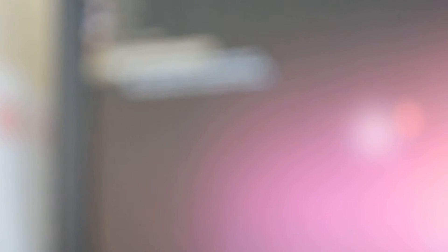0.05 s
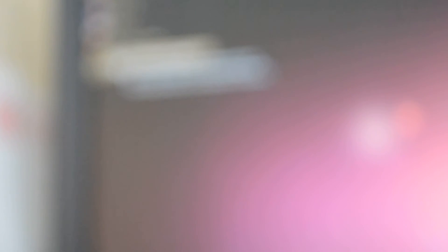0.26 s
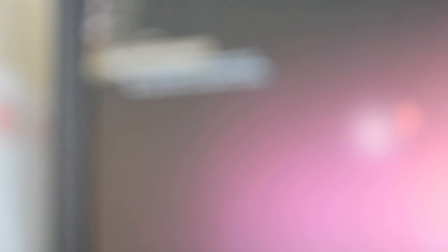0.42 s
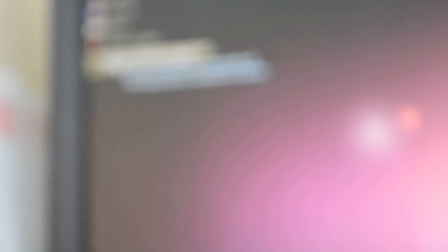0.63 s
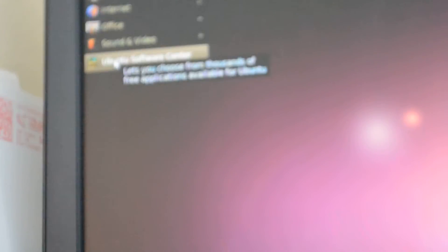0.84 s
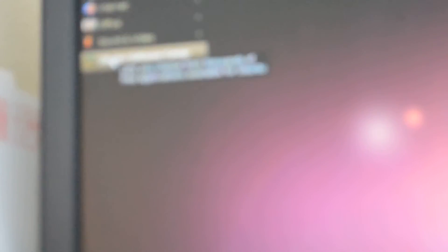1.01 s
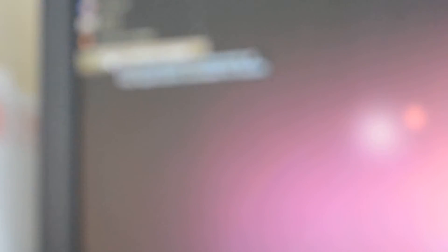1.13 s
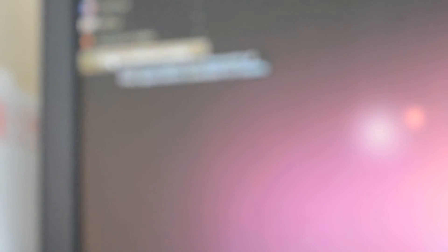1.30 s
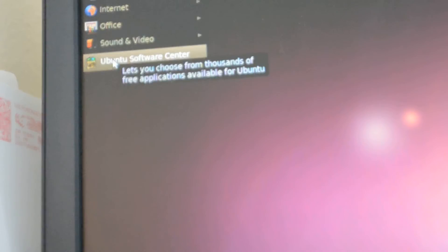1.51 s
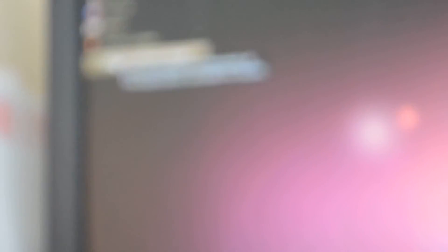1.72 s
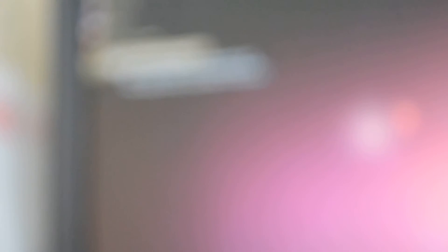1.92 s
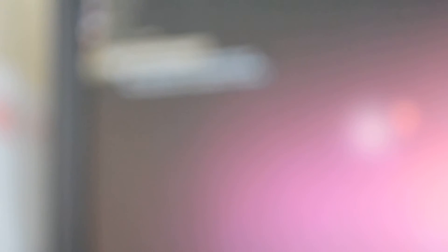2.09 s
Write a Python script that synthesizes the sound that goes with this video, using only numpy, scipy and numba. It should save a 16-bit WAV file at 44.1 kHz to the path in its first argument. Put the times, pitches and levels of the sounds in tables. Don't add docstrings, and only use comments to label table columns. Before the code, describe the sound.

After a brief quiet hiss, an autofocus motor makes two rough, wavering whirs of under a second each, separated by a tiny gap, with plastic gear clicks, high squeaks and a close, dry quiet-room sound.

```python
import sys
import numpy as np
from scipy import signal
from scipy.fft import rfft, irfft
from scipy.io import wavfile
from scipy.ndimage import uniform_filter1d
from numba import njit

SR = 44100
rng = np.random.default_rng(int(sys.argv[2]) if len(sys.argv) > 2 else 0)


def boost_factor(decibels):
    exponent = np.asarray(decibels, float) / 20
    return 10 ** exponent


def digitize_waveform(pressure):
    field = np.atleast_2d(pressure).T
    bounded = np.clip(field, -1, 1)
    quanta = np.round(bounded * 32767).astype(np.int16)
    wavfile.write(sys.argv[1], SR, quanta)


N = 94815


def level(x, db):
    return x * boost_factor(db) / np.sqrt(np.mean(x ** 2))


@njit
def svf(x, hz, width):
    y, b, l = np.empty(len(x)), 0., 0.
    for i in range(len(x)):
        g, k = np.tan(np.pi * hz[i] / SR), width / hz[i]
        v = (b + g * (x[i] - l)) / (1 + g * (g + k))
        b, l, y[i] = 2 * v - b, l + 2 * g * v, k * v
    return y


def band(x, hz, width_hz):
    hz = hz + np.zeros(len(x))
    once = svf(x + 1e-18, hz, 1.5 * width_hz)
    return svf(once, hz, 1.5 * width_hz)


def body(x, peaks):
    return sum((-1) ** k * boost_factor(db) * band(x, hz, width) for k, (hz, width, db) in enumerate(peaks))


def walk(rate_hz):
    hold = int(SR / rate_hz)
    steps = np.repeat(rng.standard_normal(N // hold + 1), hold)
    return 1.3 * uniform_filter1d(uniform_filter1d(steps, hold), hold)[:N]


def control(runs, column, t):
    rows = np.vstack(runs)
    return np.interp(t, rows[:, 0], rows[:, column])


def running(runs, t, rise_s):
    gate = 0
    for run in runs:
        start = np.clip((t - run[0][0]) / rise_s, 0, 1)
        stop = np.clip((run[-1][0] - t) / 0.00062, 0, 1)
        gate = gate + start * stop
    return gate


def rings(modes, push, chance):
    t = np.arange(SR // 8) / SR
    ring = 0
    for (hz, db, t60_s), c in zip(modes, chance):
        tone = np.sin(2 * np.pi * hz * (1 + c / 90) * t)
        ring = ring + boost_factor(db + 2 * c) * tone * 1000 ** (-t / t60_s)
    out = np.convolve(ring, push)[:len(t)]
    return out / np.abs(out).max()


def chirp(seconds, from_hz, to_hz):
    u = np.arange(int(seconds * SR)) / int(seconds * SR)
    phase = 2 * np.pi * np.cumsum(from_hz + (to_hz - from_hz) * u) / SR
    return phase, np.sin(np.pi * u ** 0.55)


# pitch_hz, density_db (per Hz)
ROOM_SPECTRUM = [(18, -40), (30, -15), (53, -28), (115, -15.5), (155, -8), (275, -1.5), (370, -1),
                 (2920, -13), (11500, -34.5), (14900, -72), (22000, -120)]
# pitch_hz, width_hz, level_db
HUM_BANDS = [(67, 3.6, -81), (115.7, 12.3, -73.5)]


def room():
    hz, density_db = np.transpose(ROOM_SPECTRUM)
    f = np.arange(N // 2 + 1) * SR / N + 1
    gain = boost_factor(np.interp(np.log(f), np.log(hz), density_db))
    hiss = irfft(rfft(rng.standard_normal(N)) * gain, N)
    hum = sum(level(band(rng.standard_normal(N), hz, width), db) for hz, width, db in HUM_BANDS)
    return level(hiss, -60) + hum


# time_s, high_db, low_db, top_db, middle_db
RATTLE_RUNS = [
    [(.2225, -41.5, -49.5, -44.5, -55), (.269, -43, -45, -56, -42), (.272, -67, -45, -74, -65),
     (.283, -46, -55, -58, -50), (.43, -44, -55, -59.5, -48.5), (.52, -43.5, -55, -59, -45.5),
     (.56, -49.5, -45.5, -60, -54.5), (.63, -49.5, -45.5, -53.5, -56), (1.117, -50, -46, -57, -51)],
    [(1.192, -41, -57, -38, -60), (1.212, -43, -50.5, -55, -41), (1.225, -43.5, -45.5, -55, -46.5),
     (1.26, -50.5, -46, -58, -53.5), (1.33, -48.5, -44.5, -51, -61.5), (1.88, -48, -44, -51, -62)],
]
# pitch_hz, width_hz, level_db
HIGH_PEAKS = [(5970, 350, 4), (6485, 280, 2), (5710, 83, -21), (3880, 35, -3.5)]
LOW_PEAKS = [(1183, 1710, -5.5), (1390, 190, 3.5), (2230, 1900, -15.5), (2560, 206, 9.5), (3010, 394, 3),
             (3550, 110, -12)]
TOP_PEAKS = [(7410, 400, -1.5), (8700, 560, -1), (9650, 740, -9), (10500, 650, -12)]
MIDDLE_PEAKS = [(5190, 510, 1), (4400, 930, -20)]
GROUP_THROB = (.8, 2.2, 3.2, .8)


def rattle(t):
    ticks_per_s, spread_db = 14000, 0.8
    out = 0
    for k, peaks in enumerate((HIGH_PEAKS, LOW_PEAKS, TOP_PEAKS, MIDDLE_PEAKS)):
        struck = rng.random(N) < ticks_per_s / SR
        ticks = struck * rng.standard_normal(N) * boost_factor(spread_db * rng.exponential(size=N))
        throb = boost_factor(GROUP_THROB[k] * walk(150))
        out = out + boost_factor(control(RATTLE_RUNS, k + 1, t)) * level(body(ticks * throb, peaks), 0)
    return out * running(RATTLE_RUNS, t, 0.00026)


# start_s, peak_db, low_ring_db, thud_db
GEAR_CLICKS = [(0.2226, -27.5, -6, -45), (0.2313, -29.5, -8.5, -46), (0.2446, -30, 1, -42),
               (0.269, -30.5, 0, -42), (0.2773, -18.5, -8, -51), (0.4319, -25, -3, -20.5),
               (0.4376, -20, -7, -33), (0.4894, -21.5, -12.5, -53), (.4922, -19, -8, -46),
               (0.5138, -30, -27, -44), (1.1162, -15, -7.5, -25), (1.192, -25.5, -10.5, -54),
               (1.2007, -31.5, -1, -49), (1.218, -33, 2, -46), (1.8801, -16.5, -11, -21.5)]
# pitch_hz, level_db, t60_s
BRIGHT_MODES = [(5220, 8.5, 0.01), (5370, 3, 0.0089), (6000, 10, 0.0087), (6020, -9, 0.013),
                (3660, 2.5, 0.0058), (6050, -16, .007), (8700, -12, 0.0037), (10100, -29, 0.0025)]
LOW_MODES = [(2200, 1, 0.018), (2373, 0.5, 0.032), (2524, 4, 0.038), (2870, -4.5, 0.0073),
             (3430, -3.5, 0.0071), (1680, -24, 0.0082)]
THUD_MODES = [(273, -10, 0.12), (424, 4.5, 0.082), (680, 8.5, 0.026)]
KNOCK_MODES = [(297.8, -1.5, 0.046), (383, -5, .04), (610, -3, 0.038)]


def clicks():
    rebound_s, rebound_db, chatter_db, shake_s = 0.0013, -2.5, -11.5, 0.003
    knock_s, knock_db = 1.241, -41.5
    out = np.zeros(N + SR)
    push_t, shake_t = np.arange(200) / SR, np.arange(SR // 80) / SR
    thin = signal.butter(3, 1500, "high", fs=SR, output="sos")
    soft_push = np.hanning(60)
    for start_s, peak_db, low_db, thud_db in GEAR_CLICKS:
        push = boost_factor(chatter_db) * rng.standard_normal(200) * np.exp(-push_t / rebound_s)
        push[0] += 1
        push[int(rebound_s * SR * (1 + rng.standard_normal() / 8))] += boost_factor(rebound_db)
        shake = rng.standard_normal(SR // 80) * np.exp(-shake_t / shake_s)
        bright = rings(BRIGHT_MODES, push, rng.standard_normal(len(BRIGHT_MODES)))
        low = rings(LOW_MODES, shake, rng.standard_normal(len(LOW_MODES)))
        thud = rings(THUD_MODES, soft_push, rng.standard_normal(len(THUD_MODES)) / 2)
        hit = signal.sosfilt(thin, bright + boost_factor(low_db) * low) + boost_factor(thud_db) * thud
        at = int(start_s * SR)
        out[at:at + len(hit)] += boost_factor(peak_db) * hit
    knock = boost_factor(knock_db) * rings(KNOCK_MODES, soft_push, np.zeros(3))
    at = int(knock_s * SR)
    out[at:at + len(knock)] += knock
    rumble_cut = signal.butter(2, 160, "high", fs=SR, output="sos")
    return signal.sosfilt(rumble_cut, out[:N])


@njit
def teeth(hz, stretch, size):
    pulses, p, k = np.zeros(len(hz) + 1), 0., 0
    for i in range(len(hz)):
        step = hz[i] * stretch[k] / SR
        p += step
        if p >= 1:
            p, k = p - 1, k + 1
            pulses[i] += size[k] * p / step
            pulses[i + 1] += size[k] * (1 - p / step)
    return pulses[:-1]


# time_s, teeth_hz, effort_db
MESH_RUNS = [
    [(.524, 1298, -51), (.545, 1277, -43), (.56, 1318, -47), (.594, 1313, -52), (.615, 1605, -38.5),
     (.72, 1723, -43), (.9, 1639, -41.5), (1.0, 1661, -43), (1.118, 1709, -46)],
    [(1.23, 1063, -45), (1.26, 1294, -51.5), (1.305, 1292, -43), (1.35, 1752, -38), (1.47, 1563, -42),
     (1.535, 1718, -40), (1.67, 1569, -40.5), (1.73, 1784, -40), (1.881, 1596, -40.5)],
]
# pitch_hz, level_db
RADIATION = [(1050, -11), (1300, -7), (1650, -3), (2600, 0.5), (3300, -14.5), (3900, -6), (4400, -24),
             (4800, -14.5), (5200, -8.5)]


def whine(t):
    tooth_jitter, tooth_scatter_db, wobble = 0.085, 5.5, 0.024
    pinion_teeth, pinion_beat_db, throb_db, width_hz = 16, 4.0, 3.0, 460
    speed = control(MESH_RUNS, 1, t)
    hz = speed * (1 + wobble * np.clip((speed - 1250) / 350, .2, 1) * walk(90))
    spacing, strength = rng.standard_normal((2, N // 10))
    pulses = teeth(hz, np.clip(1 + tooth_jitter * spacing, .5, 2), boost_factor(tooth_scatter_db * strength))
    turns = np.cumsum(speed * (1 + 0.1477 * walk(40))) / SR / pinion_teeth
    beat_db = pinion_beat_db * np.sin(2 * np.pi * turns)
    radiated_hz, radiated_db = np.transpose(RADIATION)
    out = 0
    for k in range(1, 4):
        db = np.interp(np.log(k * speed), np.log(radiated_hz), radiated_db)
        db = db + throb_db * walk(90) + beat_db
        out = out + level(band(pulses, k * hz, width_hz / k), 0) * boost_factor(db)
    return out * boost_factor(control(MESH_RUNS, 2, t) - 1) * running(MESH_RUNS, t, .01)


# start_s, peak_db,
# pitch_hz
BINDS = [(0.6054, -42, 1550), (0.6205, -34, 1446), (0.6512, -44, 1670), (0.6705, -35, 1734),
         (0.7196, -30, 1774), (0.7768, -40, 1660), (0.8173, -36, 1670), (0.9052, -29, 1730),
         (0.945, -39, 1680), (0.981, -41, 1670), (0.999, -31, 1680), (1.0756, -43, 1750),
         (1.0832, -29, 1710), (1.0954, -28, 1710), (1.1135, -29, 1623),
         (1.343, -38, 1720), (1.3612, -33.5, 1800), (1.3926, -38, 1645), (1.5337, -35, 1748),
              (1.5618, -32, 1647), (1.5824, -32, 1680), (1.6631, -33, 1570), (1.7253, -35.5, 1581),
              (1.7246, -27, 1790), (1.7841, -43, 1830), (1.7846, -34, 1715), (1.8005, -32, 1635),
              (1.8286, -45, 1870), (1.8285, -29.5, 1580)]
# start_s,
# length_s, from_hz, to_hz, level_db
START_TONES = [
    (0.526, 0.028, 4004, 3840, -42.5),
    (0.562, 0.051, 3890, 3920, -49),
    (.533, 0.03, 3650, 2870, -46),
    (.54, 0.0092, 1050, 1200, -53),
    (.588, 0.019, 2596, 2560, -39),
    (1.224, .03, 3500, 2870, -41),
    (1.25, 0.063, 3880, 3920, -49),
    (1.272, 0.05, 2570, 2680, -42.5),
]


def surges():
    length_s, surge_db, third_db = 0.0096, -4, -13
    out = np.zeros(N)
    for start_s, peak_db, hz in BINDS:
        c = rng.standard_normal(3)
        phase, shape = chirp(length_s, hz * (1 + 0.018 * c[0]), hz * (1 - 0.013 * c[0]))
        third = boost_factor(third_db + 3 * c[1]) * np.sin(3 * phase + c[2])
        at = int(start_s * SR)
        out[at:at + len(shape)] += boost_factor(peak_db + surge_db) * shape * (np.sin(phase) + third)
    flutter, waver = boost_factor(3.5 * walk(200)), .9 * walk(250)
    for start_s, seconds, from_hz, to_hz, db in START_TONES:
        phase, shape = chirp(seconds, from_hz, to_hz)
        at = slice(int(start_s * SR), int(start_s * SR) + len(shape))
        out[at] += boost_factor(db) * shape * flutter[at] * np.sin(phase + waver[at])
    return out


# start_s, peak_db,
# pitch_hz, length_s
RUBS = [(0.6162, -43, 8700, 0.0058), (0.625, -40.5, 8350, 0.0045), (0.634, -39, 7430, 0.0055),
        (0.655, -33.5, 8580, 0.0055), (0.6741, -37, 8220, 0.0042), (0.689, -41, 8660, 0.0059),
        (0.716, -49, 8350, 0.005), (0.7533, -40.5, 9460, 0.0043), (0.7826, -39.5, 8570, 0.0052),
        (0.798, -46, 8600, 0.0034), (0.8172, -36.5, 8400, 0.0053), (0.867, -49, 8540, 0.005),
        (0.8811, -50, 8400, 0.005), (0.921, -42.5, 9390, 0.005), (0.9499, -36, 8400, 0.0066),
        (0.9826, -41.5, 8650, 0.0044), (0.9865, -33.5, 8470, 0.0052), (1.0054, -42, 8080, 0.0054),
        (1.078, -55, 7450, 0.005), (1.087, -38, 8840, 0.005),
        (1.3232, -32, 8530, 0.0083), (1.337, -37, 8750, 0.0029), (1.346, -36.5, 8570, 0.0063),
             (1.353, -40, 7240, 0.0081), (1.3976, -32, 8790, 0.0047), (1.4143, -27.5, 8553, 0.0047),
             (1.431, -38, 9240, 0.0038), (1.4465, -42, 9540, 0.0083), (1.48, -32.5, 8360, .004),
             (1.486, -31.5, 8600, 0.0089), (1.5, -35, 8957, 0.0034), (1.509, -41, 8750, 0.0054),
             (1.5167, -33, 7320, .009), (1.5628, -29.5, 8920, 0.0037), (1.5779, -29.5, 8700, 0.0054),
             (1.597, -39, 9340, 0.0037), (1.6122, -38, 8700, 0.0053), (1.6469, -29.5, 8720, .012),
             (1.6735, -37, 8734, .006), (1.6789, -37, 7410, 0.013), (1.7282, -34, 8920, 0.0051),
             (1.7433, -31.5, 8640, .006), (1.761, -44, 9200, 0.0036), (1.7753, -34.5, 8830, 0.0052),
             (1.8091, -29.5, 8600, 0.011), (1.837, -39, 8800, 0.01), (1.8426, -39, 7600, 0.014)]


def squeaks():
    squeak_db, hiss_db, overtone_db, width_hz = -4, -11, -13, 370
    noise = rng.standard_normal((3, N))
    crackle = boost_factor(4.0 * walk(500))
    hiss = level(band(noise[0], 9350, 1700), hiss_db)
    overtone = level(band(band(noise[1], 13000, 900), 13000, 900), overtone_db)
    lead = N // 200
    out = np.zeros(N)
    for start_s, peak_db, hz, length_s in RUBS:
        c = rng.standard_normal(2)
        phase, shape = chirp(max(1.46 * length_s, .002), hz * (1 - .02 * c[0]), hz * (1 + 0.029 * c[0]))
        first = int(start_s * SR)
        at = slice(first, first + len(shape))
        rough = level(band(noise[2, first - lead:at.stop], hz, width_hz)[lead:], -2.9)
        scrape = crackle[at] * (hiss[at] + boost_factor(5 * c[1]) * overtone[at])
        out[at] += boost_factor(peak_db + squeak_db) * shape * (np.sin(phase) + rough + scrape)
    return out


def tail(lens, t):
    t60_s, tail_db = 0.18, -25
    decay = rng.standard_normal(SR // 4) * 1000 ** (-t[:SR // 4] / t60_s)
    decay = band(decay, 2700, 3900)
    return boost_factor(tail_db) * signal.fftconvolve(lens, decay / np.sqrt(np.sum(decay ** 2)))[:N]


def scene():
    t = np.arange(N) / SR
    lens = rattle(t) + clicks() + whine(t) + surges() + squeaks()
    return (room() + lens + tail(lens, t))[None]


def roll_off(x):
    return signal.sosfilt(signal.butter(12, 13480, fs=SR, output="sos"), x)


def record(dry):
    soft = signal.sosfilt(signal.butter(2, 8320, fs=SR, output="sos"), dry)
    cut = signal.sosfilt(signal.ellip(6, .5, 30, 11180, fs=SR, output="sos"), soft)
    return roll_off(cut)


dry = scene()
out = record(dry)
digitize_waveform(out)
```